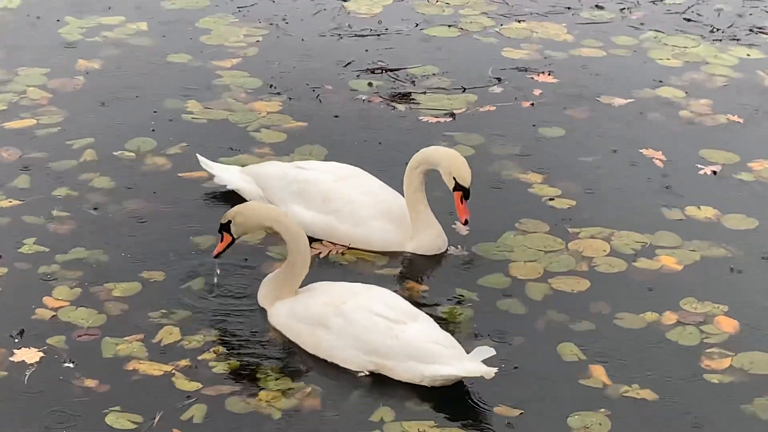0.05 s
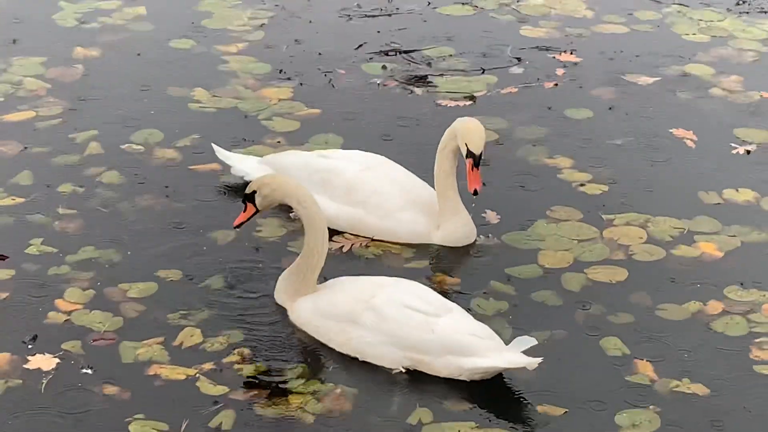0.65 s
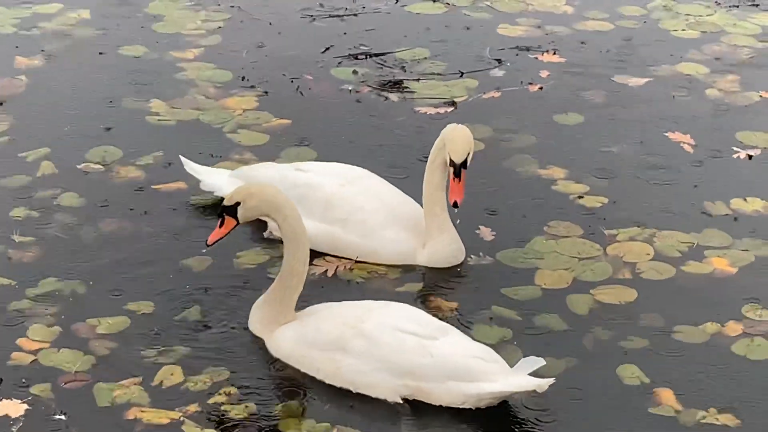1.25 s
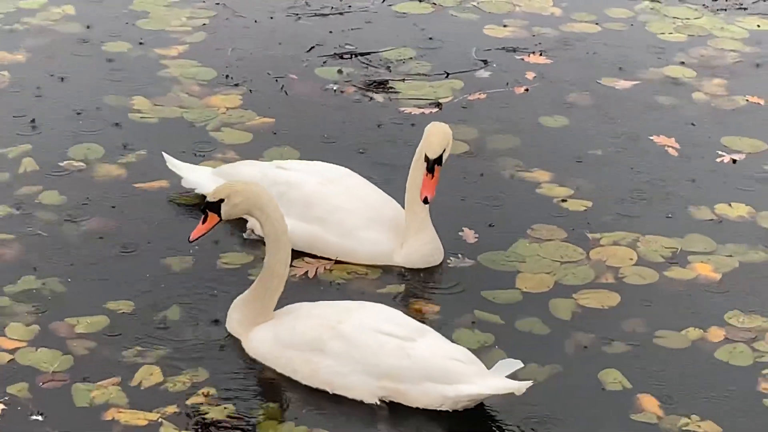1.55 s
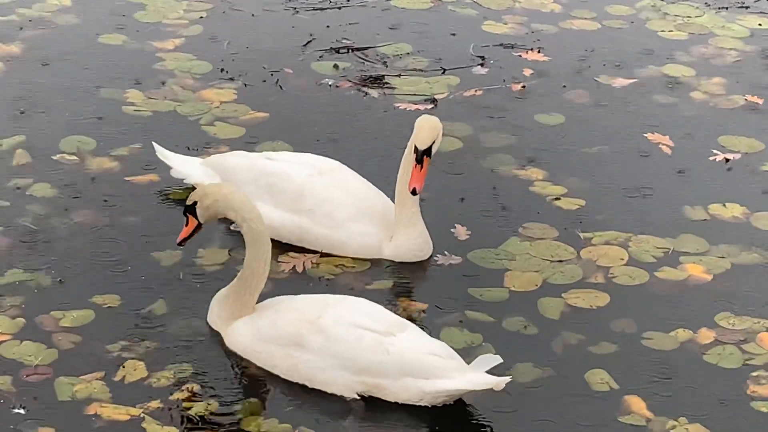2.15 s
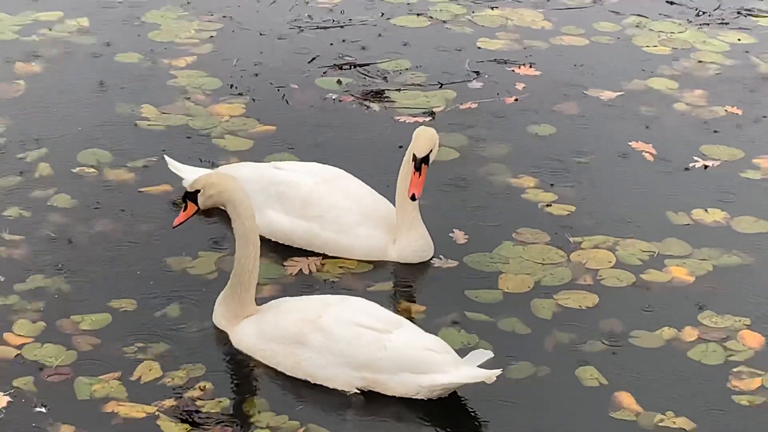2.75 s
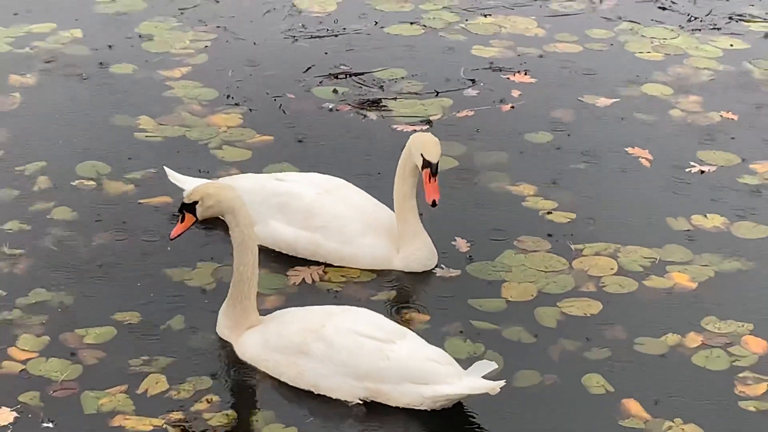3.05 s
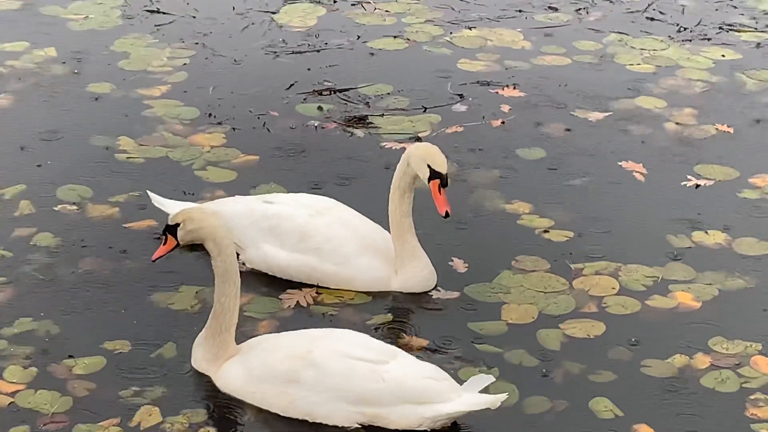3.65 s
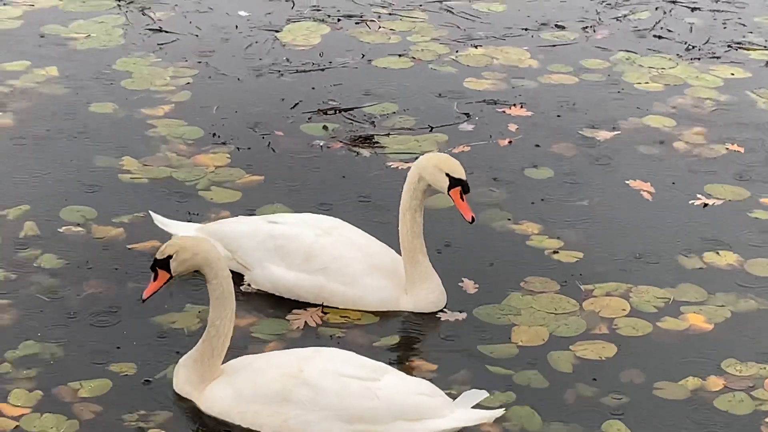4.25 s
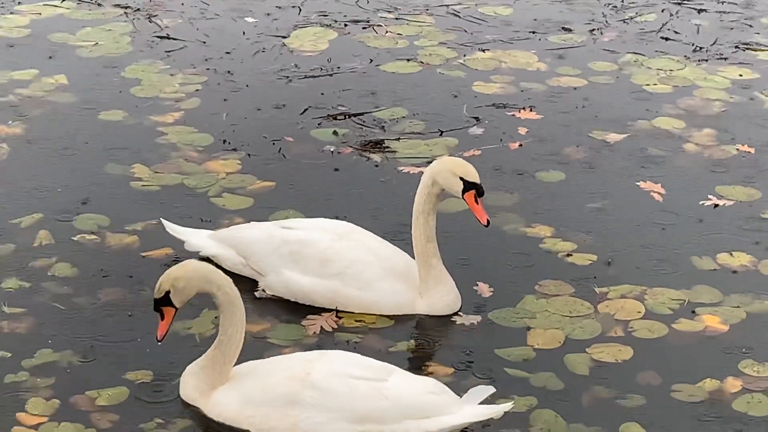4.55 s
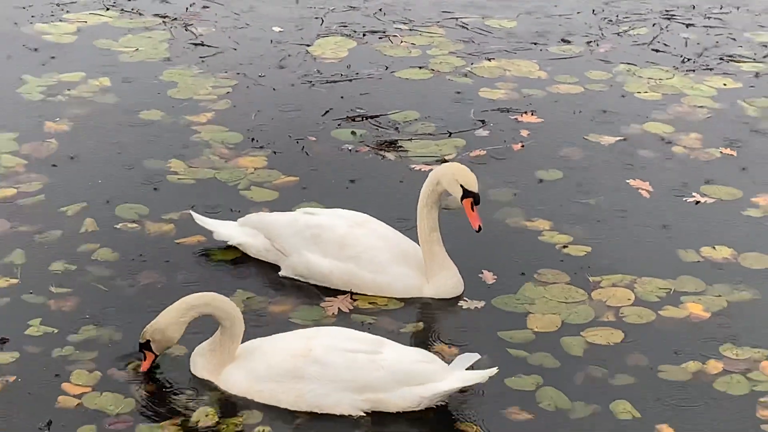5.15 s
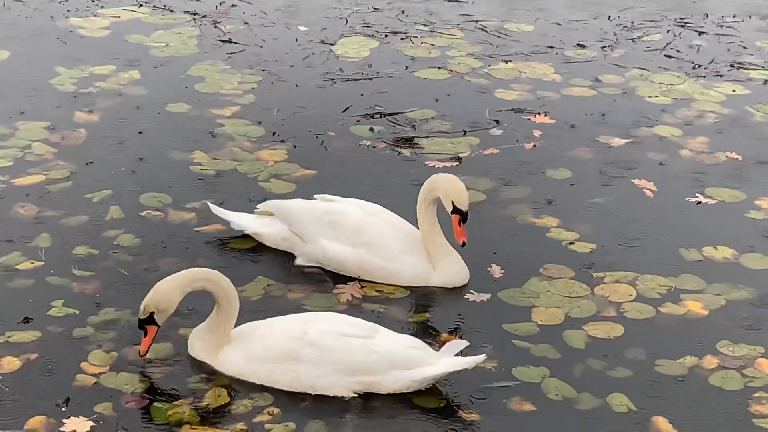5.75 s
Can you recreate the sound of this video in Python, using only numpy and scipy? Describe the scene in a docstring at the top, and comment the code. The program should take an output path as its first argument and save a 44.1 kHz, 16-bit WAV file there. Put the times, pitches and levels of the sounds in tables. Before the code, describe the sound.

Light rain falls on a taut umbrella just above the microphone, beside a pond. Two heavy drops snap on the cloth, each a sharp tick with a small thud. After a lull comes another, then a quick cluster with wet spatters, then lighter scattered taps. Tiny droplets tick in between, while fine rain hisses faintly on the water and distant traffic rumbles low.

```python
"""Raindrops snap on a taut umbrella close overhead, in light rain beside a pond.
Treble crosses the cloth faster than bass, so each drop is a tick that falls to a thud.
Some drops burst into small wet spatters, and stray droplets tick faintly between them.
Fine rain hisses on the water and far traffic rumbles."""
import sys
import numpy as np
from scipy import signal
from scipy.fft import rfft, irfft
from scipy.io import wavfile
from scipy.ndimage import uniform_filter1d, minimum_filter1d

SR = 44100
rng = np.random.default_rng(int(sys.argv[2]) if len(sys.argv) > 2 else 0)


def bounce(signal):
    """Save signal as a 16-bit WAV file at the path given by the first command-line argument."""
    frames = np.transpose(np.atleast_2d(signal))
    limited = np.clip(frames, -1, 1)
    pcm = np.round(limited * 32767).astype(np.int16)
    wavfile.write(sys.argv[1], SR, pcm)


N = 265041


# drops on the cloth: start_s, level_db, panel_hz, travel_ms (at 1 kHz), echo_ms, echo_gain
DROP_HITS = [(0.2922, 7, 110, 1.4, 0.58, .35), (0.3478, -39.5, 300, 1.1, 0.16, -0.98),
             (.5915, 1.6, 119, 1.14, .6, 0.14), (1.217, -40, 600, .6, 0.059, -1),
             (1.6606, -24, 605, 0.8, 0.55, 0.8), (2.4923, 6.5, 183.6, 1.4, 0.25, 0.56),
             (3.0399, -35, 158, 1.3, .21, -1.1), (3.1828, -9, 350, 1.25, 2.16, 0.39),
             (3.2639, 3.24, 140, 1.73, 0.24, 0.26), (3.4519, -0.2, 298, 1.3, 0.877, 0.29),
             (3.5713, -36, 151, 1.2, 0.57, 0.75), (3.67, -33.5, 171, 1.1, 0.83, 0.93),
             (3.7962, 2.9, 100, 0.64, 0.66, -0.19), (4.1831, -30.5, 150, 1.2, 0.33, 0.65),
             (4.3713, -12.5, 790, 1.55, 0.34, 0.51), (4.6048, -33.5, 170, 1.2, .53, .6),
             (4.6822, -23, 110, 1.12, 0.93, 0.27), (4.9569, -23, 200, 1, 0.3, 0.72),
             (5.2968, -29.5, 390, 1.2, 0.26, -0.71), (5.3917, -30, 450, 1.24, 0.18, -0.62),
             (5.8930, -27.5, 360, 1.45, 0.28, -0.44)]

def drops(size=8192, near_snap_db=14, loss_db_per_ms=12):
    """Each drop sends a falling chirp across the cloth, which soaks up treble on the way."""
    hz, track = np.fft.rfftfreq(size, 1 / SR), np.zeros(N)
    for start_s, level_db, panel_hz, travel_ms, echo_ms, echo_gain in DROP_HITS:
        near_rib = 1 + np.clip(echo_gain, -1, 1) * delay(hz, echo_ms / 1000)  # echo cuts notches
        snap_db = near_snap_db - loss_db_per_ms * travel_ms
        wave = cloth_wave(hz, panel_hz, snap_db, travel_ms) * near_rib * far_ribs(hz, size) * seams(size)
        add(track, start_s, undb(level_db) * irfft(wave))
    return track


# cloth radiation for one blow: freq_hz, level_db
CLOTH_SPECTRUM = [(50, 6.5), (100, 29), (200, 25), (380, 26), (600, 23), (900, 17), (1500, 23),
                  (2500, 13.5), (3300, 15.5), (5000, 10.5), (6700, 7.5), (8000, -9.5), (9000, -19),
                  (10500, -48.5), (13000, -49)]

def cloth_wave(hz, panel_hz, snap_db, travel_ms, panel_t60_s=0.0056):
    """Spectrum of one blow after crossing the cloth: travel time doubles per octave down."""
    travel_s = travel_ms / (hz + 15)  # ms at 1 kHz over Hz gives s
    phase = 2 * np.pi * np.cumsum(travel_s) * hz[1]
    # the panel rings at its lowest note and radiates little below it
    ratio = (hz + hz[1]) / panel_hz
    damping = np.log(1000) / (np.pi * panel_hz * panel_t60_s)
    panel = ratio ** 2 / np.hypot(1 - ratio ** 2, ratio * damping)
    snap = colour([(1500, 0), (5000, snap_db)], hz)
    return minimum_phase(colour(CLOTH_SPECTRUM, hz) * panel * snap) * np.exp(-1j * phase)


def far_ribs(hz, size, level_db=-10, t60_s=0.0087, above_hz=1200):
    """Direct wave plus echoes from the far ribs, which reflect only short waves: a hollow colour."""
    return 1 + undb(level_db) * noise_tail(size, t60_s) * hz ** 2 / (hz ** 2 + above_hz ** 2)


def seams(size, level_db=-25, t60_s=0.015):
    """Direct wave plus weak, short scatter from the seams."""
    return 1 + undb(level_db) * noise_tail(size, t60_s)


# bursting drops: start_s, level_db, length_s, snap_db, ring_db, spray_db
SPATTER_HITS = [(3.253, -19, 0.0067, -11, -14, -6.5), (3.2764, -19, 0.0044, -8, -3, -10),
                (3.298, -19.5, 0.0046, -15, -2, -8), (3.321, -23, .0055, -6.5, 0, -12),
                (3.349, -34, .0053, -12, 9.5, -3), (4.1055, -22.5, 0.0065, 5, 6.5, -13),
                (5.046, -33.5, .015, 10.5, 16.5, -7), (5.469, -12, .008, -1, -15, -19)]
# water rung by a spatter: pitch_hz, level_db, t60_s
WATER_MODES = [(1215, 16, 0.09), (1390, 27, 0.043), (1620, 19, .07)]
# settling spray: freq_hz, level_db
SPRAY_SPECTRUM = [(700, -27), (1100, 20), (1450, 18), (2050, 5), (2900, 24), (3700, 10), (4300, 7),
                  (6500, -5), (8000, -21)]

def spatters(size=16384, count=7, low_cut_hz=600, spray_t60_s=0.14):
    """Droplets land in quick succession, leaving a short wet ring and settling spray."""
    hz, track = np.fft.rfftfreq(size, 1 / SR), np.zeros(N)
    ring = sum(mode(hz, *row) for row in WATER_MODES)
    spray = minimum_phase(colour(SPRAY_SPECTRUM, hz))
    low_cut = hz / (low_cut_hz + hz)  # droplets are too light to stir the bass
    for start_s, level_db, length_s, snap_db, ring_db, spray_db in SPATTER_HITS:
        jitter, sizes = rng.random((count, 2)).T
        places = (np.arange(count) + jitter) / count
        weights = undb(15.0 * sizes - 2.1 * places)  # early droplets tend to be bigger
        burst = sum(w * delay(hz, p * length_s) for p, w in zip(places, weights))
        burst /= np.linalg.norm(weights)
        sound = cloth_wave(hz, panel_hz=200, snap_db=snap_db, travel_ms=0.707) * low_cut * burst
        sound += undb(ring_db) * ring * delay(hz, length_s / 2)
        sound += undb(spray_db) * spray * noise_tail(size, spray_t60_s)
        add(track, start_s, undb(level_db) * irfft(sound))
    return track


def drizzle(size=4096, count=45, gain_db=10.0, spread_db=11):
    """Stray droplets, mostly tiny, tick on the cloth at random; their level follows the hiss."""
    hz, track = np.fft.rfftfreq(size, 1 / SR), np.zeros(N)
    for when, weight, hardness in rng.random((count, 3)):
        droplet = cloth_wave(hz, panel_hz=450, snap_db=10.5 * hardness + 1, travel_ms=1.044)
        add(track, when * N / SR, undb(spread_db * weight ** 2) * irfft(droplet * seams(size)))
    return track * undb(hiss_db() + gain_db)


# shading of the right channel: freq_hz, right_minus_left_db, right_lead_ms
RIGHT_SHADE = [(200, 0.5, .42), (450, -1.5, 0.39), (750, -0.5, 0.3), (1065, -6.5, 0.23), (1510, -10, 0.4),
               (1940, -14, 0.34), (2570, -20, 0.28), (3330, -19, 0.4), (3800, -13, .39),
               (4500, -16.5, 0.41), (4960, -21.5, .39), (6500, -10, 0.382)]

def shade_right(cloth):
    """Stereo pair: the cloth's sound reaches the right side sooner and duller."""
    hz = np.fft.rfftfreq(N, 1 / SR)
    at_hz, *columns = np.transpose(RIGHT_SHADE)
    shade_db, lead_ms = (np.interp(hz, at_hz, column) for column in columns)
    right = irfft(rfft(cloth) * undb(shade_db) * delay(hz, -lead_ms / 1000), N)
    return np.array([cloth, right])


# background hiss: time_s, level_db
HISS_LEVELS = [(0, -59.5), (1.0, -61.5), (1.85, -60.5), (2.95, -65.5), (3.6, -60.5), (4.4, -61.5),
               (4.85, -63.5), (5.3, -61), (6.0, -64)]

def hiss_db(dip_start_s=0.588, fall_s=0.047, recover_s=0.27, dip_db=-12):
    """Level of the background hiss over time; it dips briefly at about 0.59 s."""
    t = np.arange(N) / SR
    dip = np.interp(t - dip_start_s, [0, fall_s, fall_s + recover_s], [0, dip_db, 0])
    return np.interp(t, *np.transpose(HISS_LEVELS)) + dip


# hiss of the pond: freq_hz, level_db
HISS_SPECTRUM = [(900, 14.5), (1250, 0.5), (1700, 0.5), (2500, -4.5), (3100, -1.5), (3700, -4.5),
                 (4300, -3.5), (5500, -8.5), (6600, -9.5), (7200, -18.5), (7900, -34), (11000, -30.5)]
# hiss balance: freq_hz, left_minus_right_db
HISS_PAN = [(1000, -3), (1300, 8.5), (1900, 5), (2600, -2), (3200, 2.5), (4200, 4), (6500, 7)]

def pond_rain(gain_db=-2.0, grain_db=4.5):
    """Countless tiny impacts of uneven size on the pond merge into a hiss."""
    impacts = rng.standard_normal((2, N)) * undb(grain_db * rng.standard_normal(N))
    hiss = stereo_band(impacts, HISS_SPECTRUM, HISS_PAN, band_hz=(1210, 18000), correlation=-0.13)
    return undb(hiss_db() + gain_db) * hiss


# far vehicles: nearest_s, swell_s, rumble_db, engine_db, tyres_db
VEHICLE_PASSES = [(.12, 0.15, -49.5, -53.5, -55.5), (2.0, 0.41, -53, -51, -56.5),
                  (3.88, 0.48, -45, -66, -64.5), (4.821, 0.9, -60, -43.5, -63.5)]
# steady roads: rumble_db, engine_db, tyres_db
ROAD_FLOOR = [-48, -54, -61.5]

def road_levels_db():
    """Rumble, engine and tyre levels: each vehicle adds a bell-shaped swell to the steady roads."""
    t = np.arange(N) / SR
    power = undb(ROAD_FLOOR)[:, None] ** 2
    for nearest_s, swell_s, *parts_db in VEHICLE_PASSES:
        swell = np.exp(-((t - nearest_s) / swell_s) ** 2)
        power = power + undb(parts_db)[:, None] ** 2 * swell
    return 10 * np.log10(power)


# far road noise: freq_hz, density_db
ROAD_SPECTRUM = [(13, -50), (22, -34.5), (50, 3), (102, 2.5), (149, -3.5), (238, -7), (309, -14.5),
                 (374, -17.5), (477, -21.5), (762, -25.5), (939, -29.5), (1400, -37), (1820, -63.5),
                 (3080, -120)]

def traffic(hum_hz=98, hum_db=-55.5):
    """Far roads: unsteady rumble, engines that swell and fade, tyre wash and a wavering hum."""
    rumble_db, engine_db, tyres_db = road_levels_db()
    noise = rng.standard_normal((3, 2, N))
    pan = [(100, 0.5), (500, 2.5), (950, -5.0)]  # freq_hz, left_minus_right_db
    rumble = stereo_band(noise[0], ROAD_SPECTRUM, pan, band_hz=(22, 122.6), correlation=0.6)
    engines = stereo_band(noise[1], ROAD_SPECTRUM, pan, band_hz=(104.8, 395), correlation=0.14)
    tyres = stereo_band(noise[2], ROAD_SPECTRUM, pan, band_hz=(361, 1130), correlation=0.59)
    roads = undb(rumble_db + 1.7 * wander(rate_hz=12)) * rumble
    roads += undb(engine_db + 0.82 * wander(rate_hz=12)) * engines
    roads += undb(tyres_db + 0.5 * wander(rate_hz=8)) * tyres
    hum_cycles = np.cumsum(hum_hz * (1 + 0.01554 * wander(rate_hz=8.3))) / SR
    return roads + undb(hum_db + wander(rate_hz=2.6)) * np.sin(2 * np.pi * hum_cycles)


def stereo_band(noises, spectrum, pan, band_hz, correlation):
    """Two independent noises as one coloured stereo band with mid rms 1."""
    hz = np.fft.rfftfreq(N, 1 / SR) + 1e-3
    low_hz, high_hz = band_hz
    band = colour(spectrum, hz) / np.sqrt((1 + (low_hz / hz) ** 10) * (1 + (hz / high_hz) ** 10))
    mid, side = rfft(noises) * band * np.sqrt([[1 + correlation], [1 - correlation]])
    lean = np.sqrt(colour(pan, hz))
    pair = irfft([(mid + side) * lean, (mid - side) / lean], N)
    return pair / pair.mean(axis=0).std()


def wander(rate_hz):
    """Random steps, smoothed twice; spread near 1."""
    hold = int(SR / rate_hz)
    steps = np.repeat(rng.standard_normal(N // hold + 1), hold)
    return 1.3 * uniform_filter1d(uniform_filter1d(steps, hold), hold)[:N]


def minimum_phase(gain):
    """Give a gain curve the phase of a resonator that rings only after it is struck."""
    cepstrum = irfft(np.log(gain))
    half = len(cepstrum) // 2
    cepstrum[1:half] *= 2
    cepstrum[half + 1:] = 0
    return np.exp(rfft(cepstrum))


def mode(hz, pitch_hz, level_db, t60_s):
    """Spectrum of one decaying resonance."""
    width_hz = np.log(1000) / (np.pi * t60_s)
    return undb(level_db) * width_hz * pitch_hz / (pitch_hz ** 2 - hz ** 2 + 1j * hz * width_hz)


def noise_tail(size, t60_s):
    """Spectrum of decaying noise of unit energy."""
    noise = rng.standard_normal(size) * undb(-60 * np.arange(size) / SR / t60_s)
    return rfft(noise / np.linalg.norm(noise))


def delay(hz, lag_s):
    """Spectrum of a delay."""
    return np.exp(-2j * np.pi * hz * lag_s)


def colour(points, hz):
    """Gain at hz from rows of freq_hz, level_db."""
    at_hz, db = np.transpose(points)
    return undb(np.interp(np.log(hz + 1), np.log(at_hz), db))


def undb(db):
    """Decibels to gain."""
    return 10 ** (np.asarray(db) / 20)


def add(track, start_s, sound):
    """Mix a sound into a track at start_s."""
    start = max(int(round(start_s * SR)), 0)
    part = sound[:max(len(track) - start, 0)]
    track[start:start + len(part)] += part


def scene():
    """The umbrella overhead, the roads beyond and the pond."""
    umbrella = shade_right(drops() + spatters() + drizzle())
    return umbrella + traffic() + pond_rain()


def record(dry, ceiling=0.92, window_samples=45, cutoff_hz=12300):
    """A limiter eases the gain down around the tallest peaks; a low-pass cuts the top."""
    needed_gain = ceiling / np.maximum(np.abs(dry), ceiling)
    held_gain = minimum_filter1d(needed_gain, window_samples, axis=1)
    gain = uniform_filter1d(held_gain, window_samples, axis=1)
    low_pass = signal.butter(10, cutoff_hz, fs=SR, output="sos")
    return signal.sosfiltfilt(low_pass, dry * gain)


dry = scene()
out = record(dry)
bounce(out)
```